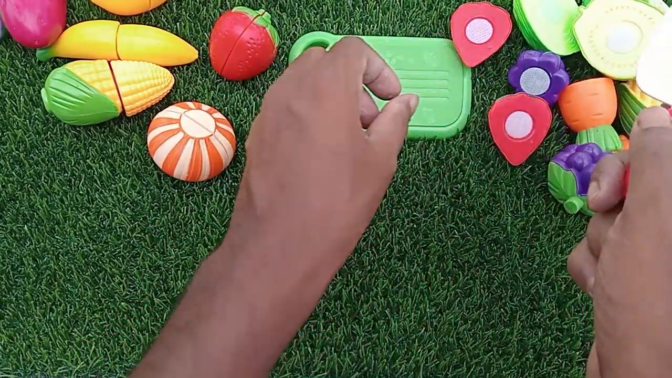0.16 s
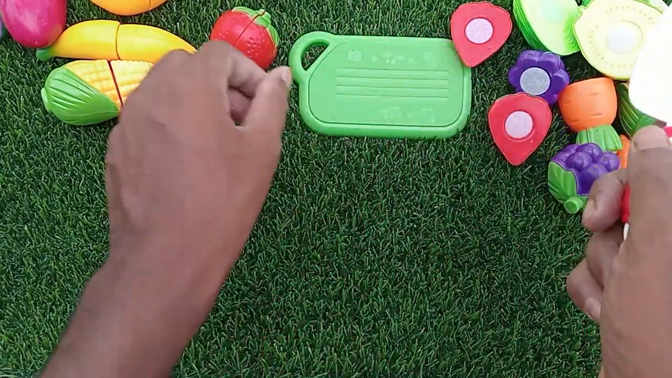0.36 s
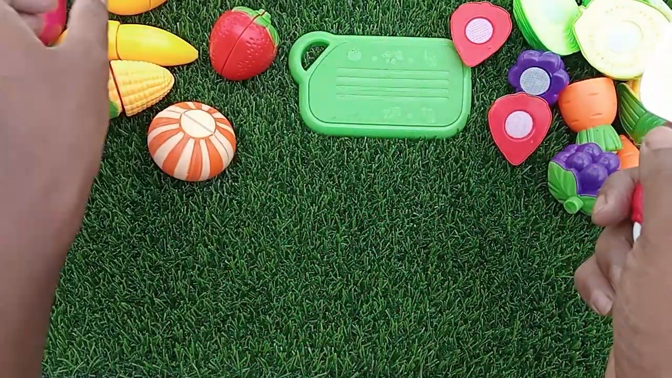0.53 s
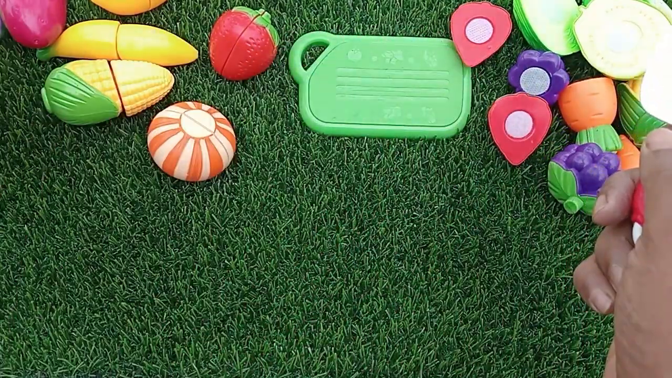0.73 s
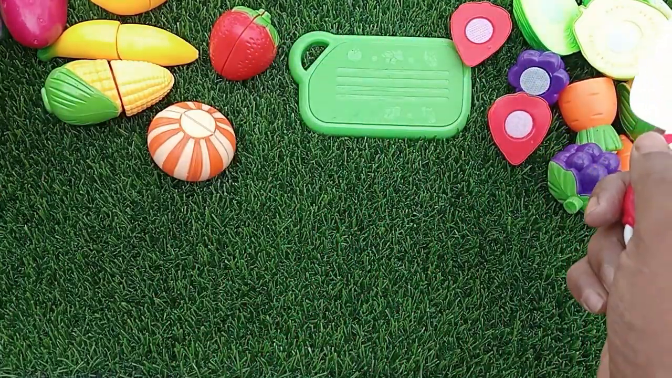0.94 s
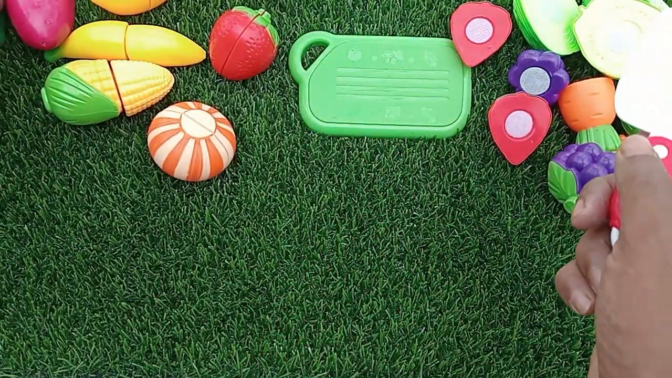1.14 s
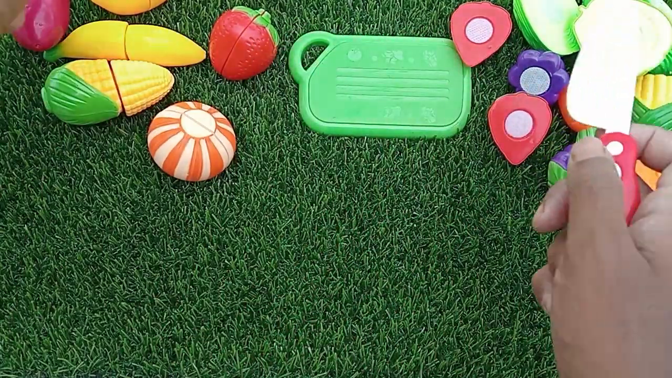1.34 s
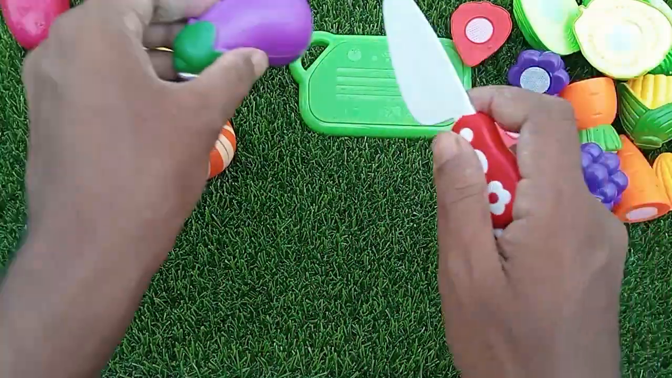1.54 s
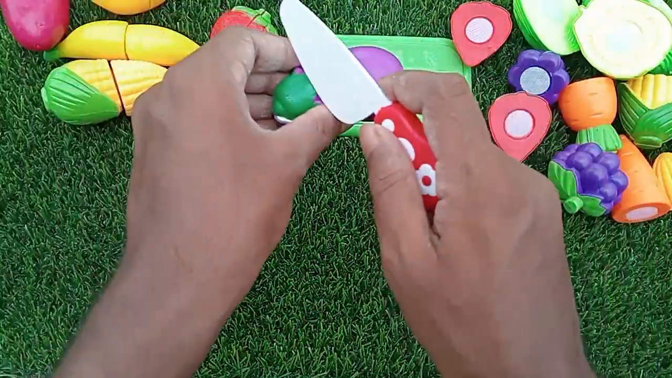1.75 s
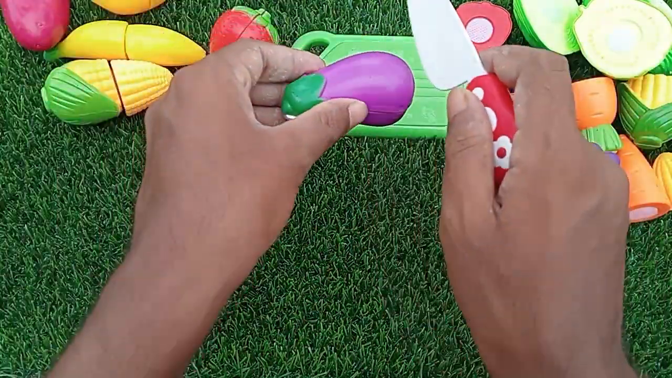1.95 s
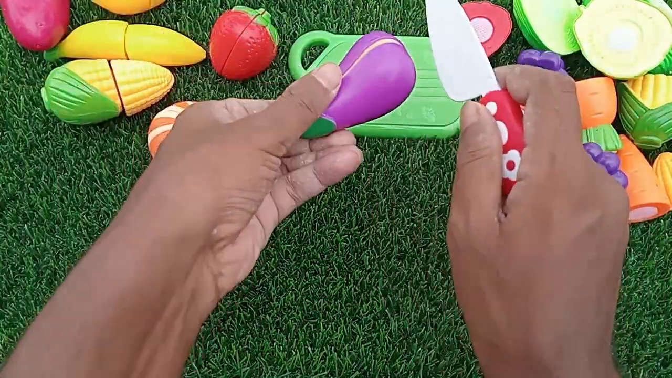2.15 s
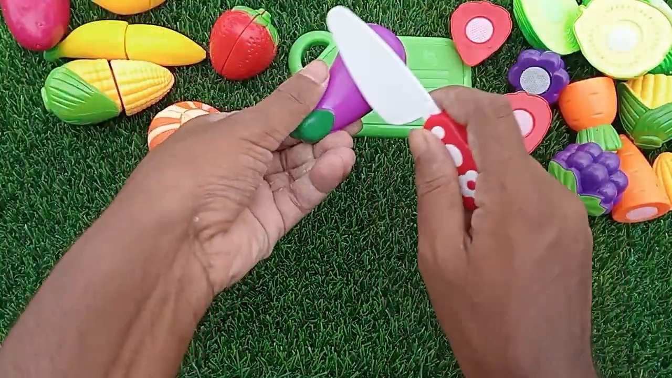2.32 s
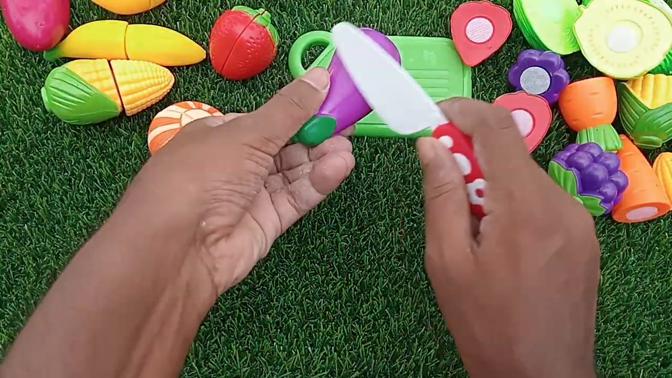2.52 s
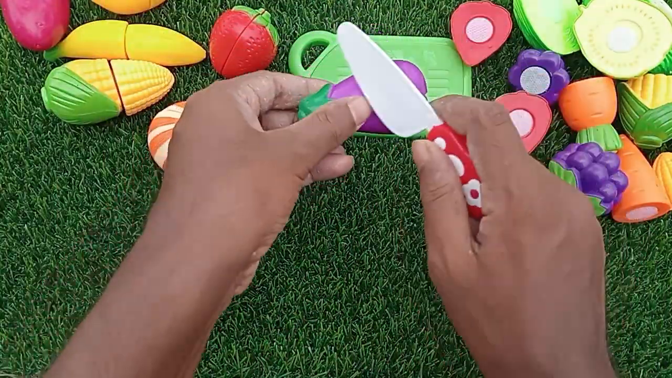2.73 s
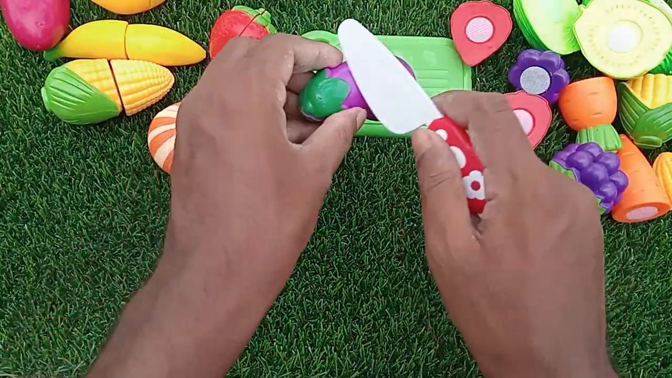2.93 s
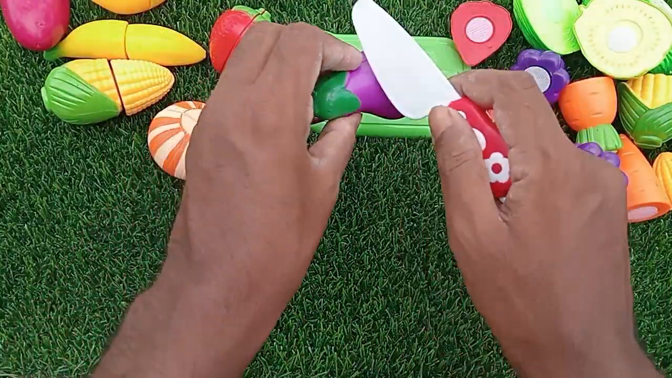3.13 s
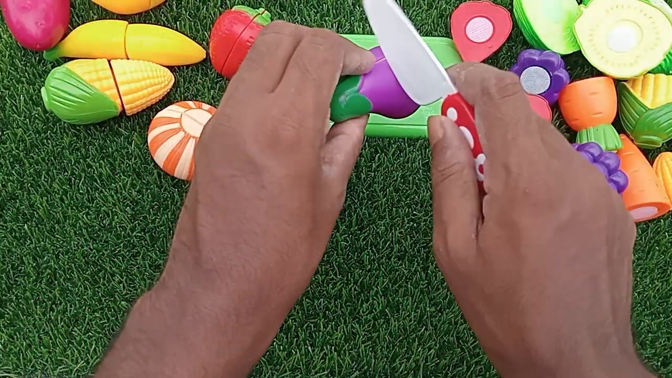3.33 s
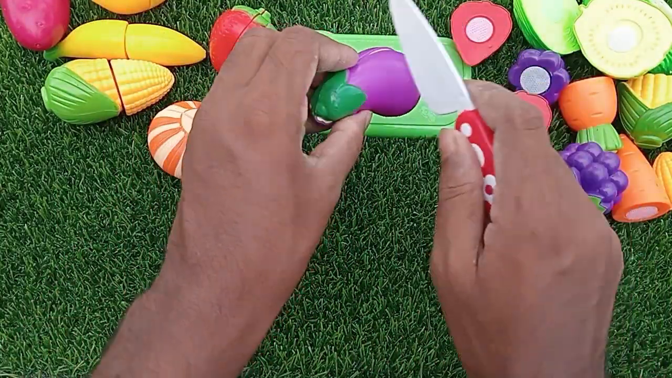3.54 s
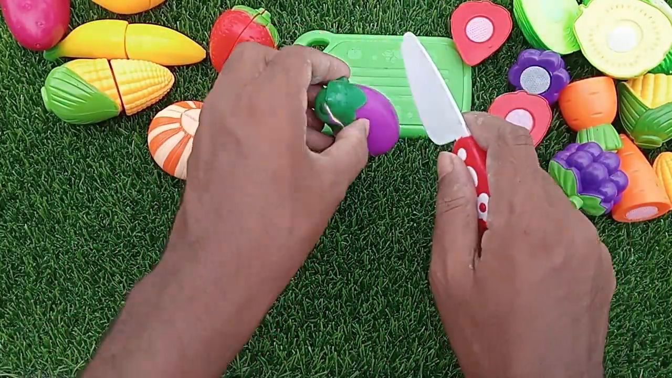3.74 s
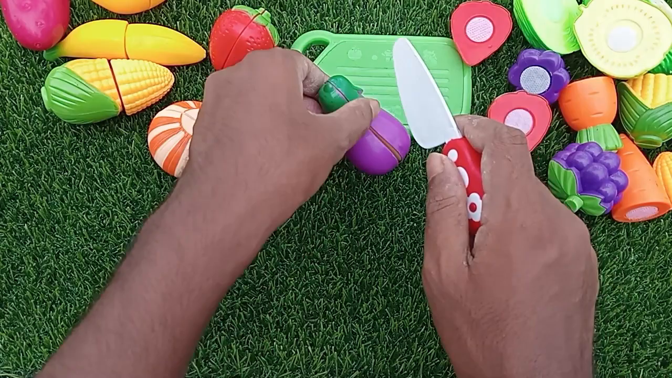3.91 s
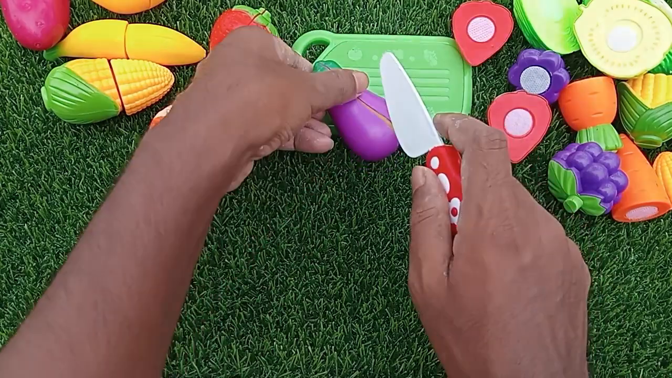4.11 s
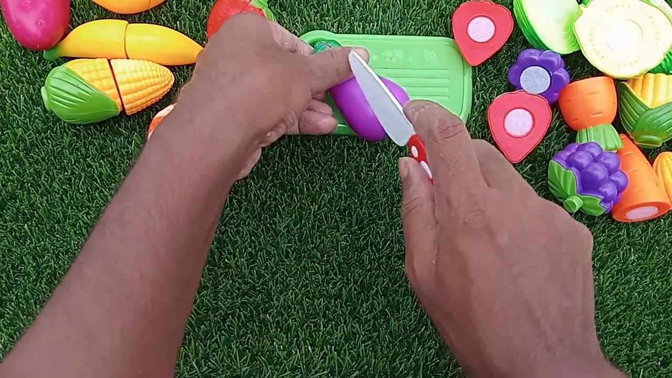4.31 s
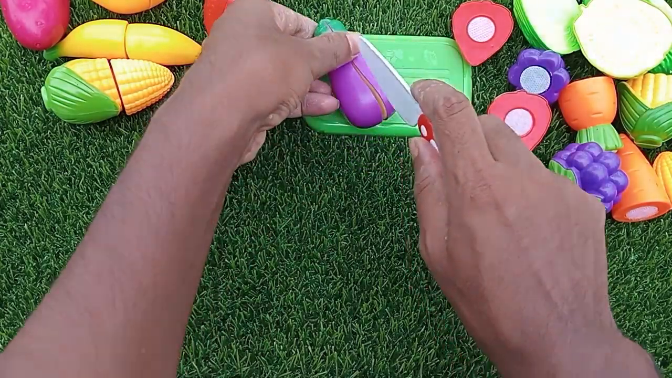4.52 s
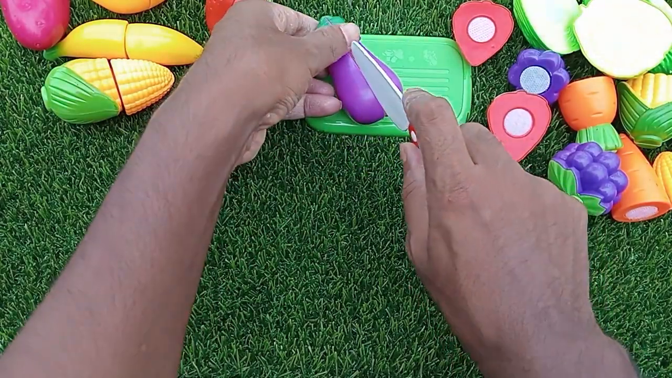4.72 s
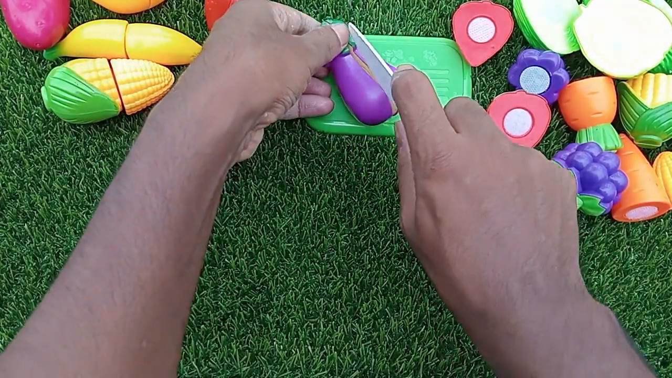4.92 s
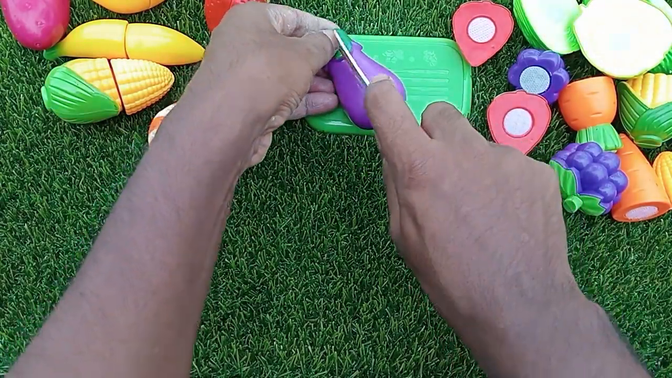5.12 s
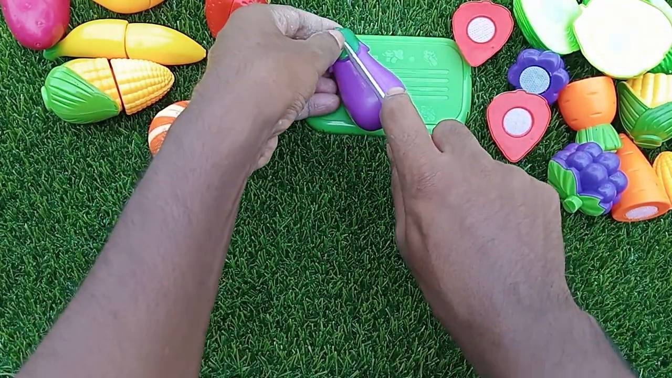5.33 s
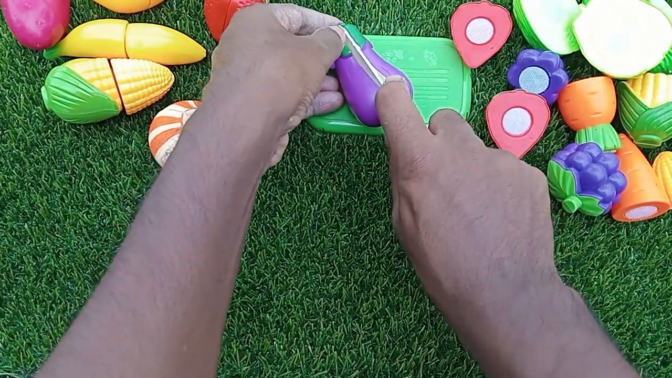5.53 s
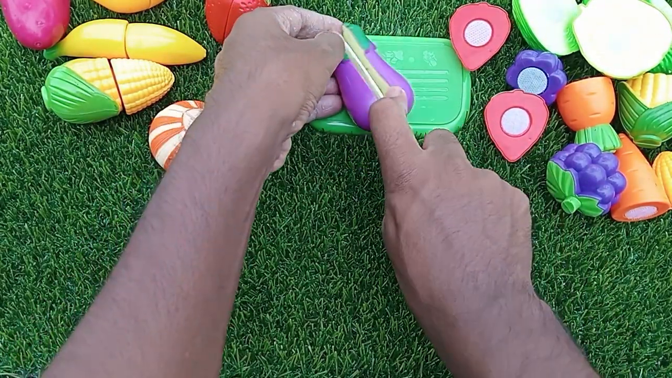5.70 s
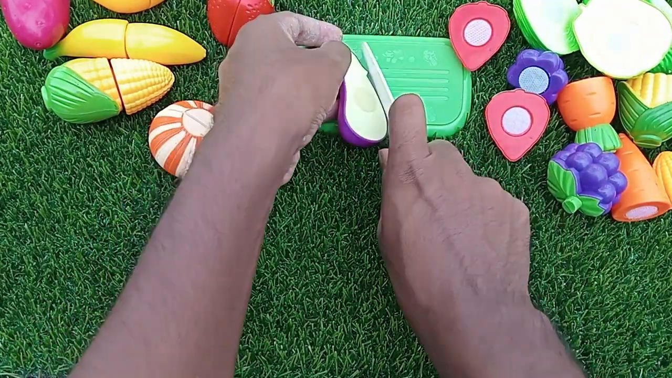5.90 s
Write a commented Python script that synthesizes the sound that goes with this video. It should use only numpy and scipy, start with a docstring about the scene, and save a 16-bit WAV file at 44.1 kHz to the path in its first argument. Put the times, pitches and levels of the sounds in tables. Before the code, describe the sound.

A loose plastic toy piece clicks and rocks once right at the start, close to the microphone. A soft hiss and low puffs of air on the microphone continue throughout, and two faint, falling chirps sound far away in the first second. From about 1.8 seconds a plastic knife taps a hollow toy eggplant, roughly four or five times a second, each a sharp clack with a short hollow ring; the three loudest come between 3.4 and 3.7 seconds. Quieter knocks and dull bumps follow, with a stronger puff of air near 4.7 and a clearer tap at 4.9. From 5.4 to 5.8 seconds the hook-and-loop pad between the halves rips apart in a quickening, growing run of crackling snaps. One half drops on the toy cutting board with a short clatter and thump. A faint, distant rising hoot comes at about 6 seconds.

```python
"""At a toy cutting board, close up, a hollow plastic fruit is turned in the hand and tapped with a
plastic knife; each tap rings its thin wall and the hollow inside. The knife then prises the halves
apart: the hook-and-loop pad rips in a quickening run of snaps and one half drops on the board.
Air buffets the microphone over a soft hiss; far off are two faint chirps and a rising hoot."""
import sys
import numpy as np
from scipy import signal
from scipy.fft import rfft, irfft
from scipy.io import wavfile
from scipy.ndimage import uniform_filter1d

SR = 44100
rng = np.random.default_rng(int(sys.argv[2]) if len(sys.argv) > 2 else 0)


def transcribe(u):
    """Save the signal u as a 16-bit wav file named by the first command-line argument.

    u: samples, shape (n,) or (channels, n), limited to [-1, 1]; the rate is SR.
    q: integer samples, one column per channel.
    """
    v = np.clip(np.atleast_2d(u).T, -1, 1)
    q = np.round(v * 32767).astype(np.int16)
    wavfile.write(sys.argv[1], SR, q)


N = 267246
TIME = np.arange(N) / SR
AGE = np.arange(SR // 10) / SR   # seconds since a contact

# Table levels are relative: the functions add their own trims.
# knocks on the hollow fruit, sharp taps and a few dull bumps:
# t/s, level/dB, wall f/Hz, hollow f/Hz, hollow ring/dB, thud/dB, crack/dB, after-hiss length/s
FRUIT_KNOCKS = [(1.821, -28, 2700, 1900, -26, -18, -14, 0.0081), (1.854, -38, 2800, 1910, -24, -26, -12, 0),
                (1.8582, -17, 2780, 1730, -12.5, -14, -13.5, 0.064),
                (2.1399, -32, 3800, 2350, -12, -7.5, 5.5, 0.059),
                (2.3523, -21.5, 3200, 2030, -23, -16, -11.5, 0.089),
                (2.5624, -18.5, 2720, 1890, -14.5, -17, -7.5, .055),
                (2.7864, -41.5, 3630, 1940, -9, -7, -6.5, 0.0087),
                (2.811, -25.5, 3460, 1900, -6.5, -11.5, -3, 0.047),
                (2.9806, -20, 3800, 1880, -8, -23, -10.5, 0.017),
                (3.214, -24, 2600, 2000, -6.5, -28, -7, 0.042),
                (3.409, -11.5, 3880, 1980, -7, -13.5, -8.5, 0),
                (3.5705, -11, 3940, 2040, -4, -12.5, -11.5, 0),
                (3.6886, -10.5, 4100, 1960, -2.5, -12.5, -5, 0.024),
                (4.524, -48, 4400, 2250, -14, -20, -20, 0.0027),
                (4.576, -51, 2400, 2290, 2.5, -6, -22, 0.0041), (4.676, -46, 3000, 1620, -3, -5, -28, 0),
                (4.9255, -27, 4000, 1700, -10.5, -14, -4.5, 0.034),
                (4.982, -46, 4400, 2250, -14, -19, -11, 0.0038),
                (5.067, -45, 4370, 2250, -7.5, -16, -12, 0.0028), (5.2466, -36, 2400, 2240, 2, -7.5, -9, 0),
                (5.255, -43, 2400, 2250, -1, -2, -12, 0.0015),
                (5.7723, -25.5, 2600, 1870, 1.5, -21, -9, 0.015),
                (5.799, -26, 4830, 1846, 1.5, -4, -8, 0.023),
                (5.843, -42, 4400, 1890, -5, -5, -5.5, 0.0017)]
# big bunches of hooks letting go: t/s, level/dB, wall f/Hz
SNAPS = [(5.3704, -27.5, 3420), (5.3995, -33.5, 3300), (5.4181, -27.5, 4340), (5.426, -22.5, 4380),
         (5.4379, -31.5, 4430), (5.4506, -27.5, 4270), (5.4617, -21, 3150), (5.4807, -28, 3130),
         (5.4913, -25, 3100), (5.519, -32, 4460), (5.5274, -20, 4350), (5.5577, -34, 3030),
         (5.5651, -22, 4350), (5.582, -24, 4360), (5.5918, -22.5, 4500), (5.5994, -21, 3270),
         (5.616, -24.5, 4570), (5.6233, -21.5, 4530), (5.6418, -20, 3630), (5.6482, -17, 4920),
         (5.6622, -28.5, 5130), (5.671, -22, 2520), (5.6844, -18.5, 2940), (5.696, -17.5, 2480),
         (5.7287, -31, 2470), (5.7335, -14.5, 2780), (5.751, -39, 2550), (5.771, -19, 3080)]
# crackle of single hooks between the snaps: t/s, rate/Hz, level/dB
PEEL = [(5.36, 2, -71), (5.42, 200, -48), (5.505, 40, -32), (5.55, 50, -31), (5.6, 400, -28),
        (5.69, 500, -34), (5.715, 120, -38.5), (5.76, 104, -43), (5.775, 791, -25.5), (5.81, 0, -25)]
# the fruit bumping the board: t/s, shell level/dB, board level/dB
BUMPS = [(4.0504, -39, -62), (5.141, -46.5, -40.5), (5.178, -50.5, -43), (5.7, -59, -32.5),
         (5.735, -51, -33), (5.773, -36, -31), (5.7846, -26, -26), (5.7901, -33, -29.5), (5.7984, -42, -30),
         (5.843, -65, -46), (5.982, -54.5, -66), (6.033, -44, -62)]
# a loose piece is let go and rocks once: t/s, level/dB
LOOSE_CLICKS = [(0.0879, -33), (0.129, -47)]
# short faint hisses with their own timing: t/s, length/s, level/dB
FAINT_HISSES = [(0.622, .025, -60.5), (1.98, 0.21, -63), (3.01, 0.049, -48), (5.239, 0.024, -45),
                (5.989, 0.052, -52)]
# far falling chirps, two overlapping notes each: t/s, length/s, start f/Hz, end f/Hz, level/dB
CHIRPS = [(0.176, 0.071, 4330, 4220, -59), (0.235, 0.065, 3840, 2754, -52), (0.697, .05, 4650, 4520, -62),
          (0.726, 0.064, 4000, 3630, -55.5)]
# far hoot: t/s, f/Hz, level/dB
HOOT = [(5.86, 573, -85), (5.91, 619, -62), (5.96, 657, -62), (5.995, 690, -53), (6.06, 695, -56)]
# draught on the microphone: t/s, level/dB
DRAUGHT = [(0.0, -51), (0.34, -41.5), (0.54, -55), (1.28, -54), (1.79, -49), (2.6, -55.5), (3.05, -56),
           (3.98, -60.5), (5.75, -56.5), (6.06, -59)]
# puffs of air: peak t/s, length/s, level/dB
GUSTS = [(0.005, .08, -40.5), (0.29, 0.23, -40), (0.464, 0.12, -39), (0.606, 0.051, -40),
         (0.895, 0.16, -43), (1.35, 0.048, -46), (1.53, 0.08, -43.5), (1.64, 0.12, -39.5),
         (2.091, 0.055, -43.5), (2.3, 0.24, -46), (3.248, .16, -48), (3.9, 0.036, -46), (4.027, 0.092, -50),
         (4.697, .17, -33), (5.47, .24, -50)]
# the bed of hiss: t/s, body level/dB, treble level/dB
BED_LEVELS = [(0, -56.5, -70.5), (.9, -58.5, -68), (1.1, -57, -65.5), (2.2, -58, -67.5), (3, -57.5, -65.5),
              (4, -58, -66.5), (5.2, -56, -66), (6.06, -57, -65)]

# resonances: f/Hz, level/dB, t60/s
SHELL_MODES = [(2850, 8.5, 0.006), (3350, 4, 0.0056), (3800, -3, 0.011), (4360, -3.5, 0.01),
               (4730, -12.5, 0.014)]   # the fruit's thin wall
HALVES_MODES = [(2480, -7, 0.011), (3040, -8.5, 0.01), (4700, -7, 0.0076), (5260, -11.5, 0.012)]   # the halves, held apart by the knife
BOARD_MODES = [(178, -5, 0.034), (294, -6, 0.053), (406, -8, 0.011), (575, -6, 0.035), (690, -6, 0.025)]   # the board on its soft mat
PIECE_MODES = [(1928, 1.5, 0.035), (3480, -8, 0.078), (4150, 0.5, .022), (7090, -16.5, 0.059),
               (8600, -20.5, 0.064)]   # the loose piece

# tone colours: f/Hz, level/dB
WALL_EQ = [(1500, -41), (2100, -14.5), (2500, 0.5), (3000, -6), (3900, 4), (4600, -1), (5400, -16),
           (6500, -27), (9000, -57.5)]   # clack of a contact
THUD_EQ = [(80, -12.5), (200, 1), (400, 7.5), (800, -3), (1200, 3), (1600, -5), (2100, -16), (3000, -35)]   # its low body
CRACK_EQ = [(3500, -20), (5200, -1.5), (6000, -3), (7500, -4.5), (9000, 0.5), (10500, -8), (13000, -15.5),
            (15500, -8)]   # its bright edge
PAD_EQ = [(100, -33), (220, -6.5), (500, -17.5), (1200, -7.5), (1500, -15), (2000, -0.5), (2500, -4),
          (3300, -1.5), (3800, -6), (4700, -1), (5400, -11), (6500, -10.5), (9000, -39)]   # body of the ripping pad
HOOK_EQ = [(3500, -21), (5200, -8.5), (6200, 1), (7600, -3), (9000, -0.5), (10000, -8), (12400, -9.5),
           (13300, -9), (14500, -8), (15500, -5.5)]   # bright edge of a hook letting go
FAINT_HISS_EQ = [(1200, -8), (2500, -4), (3300, 1.5), (4300, -1), (5500, -9), (7500, -12.5), (9000, -5.5),
                 (11000, -19), (15500, -15.5)]   # colour of the faint hisses
RUMBLE_EQ = [(15, -56), (25, -38), (40, -11.5), (58, -0.5), (80, 1.5), (115, -1.5), (160, -9.5), (240, -21),
             (400, -34.5), (800, -69.5)]   # air on the microphone
BED_EQ = [(100, -3.5), (200, 4.5), (350, 0.5), (650, -1), (1000, -5), (1800, -8), (3000, -8.5), (4100, -8),
          (5200, -18.5), (7000, -24), (10000, -58)]   # body of the hiss bed
BED_TREBLE_EQ = [(3500, -24), (5500, 0), (7500, -3), (9000, 3.5), (10500, -8), (13000, -10.5),
                 (15500, -9.5)]   # its airy top

THUD_HZ = 1260   # resonance of the plastic's thud


def fruit_knocks(hollow_trim_db=2.5, thud_trim_db=0.5, gripped_t60=0.006, free_t60=0.042):
    """Sharp taps and a few dull bumps: the less the fingers damp the hollow, the more it rings."""
    out = np.zeros(N)
    for s, level_db, wall_hz, hollow_hz, ring_db, thud_db, crack_db, _ in FRUIT_KNOCKS:
        t60 = gripped_t60 + (free_t60 - gripped_t60) * from_db(min(ring_db, 0)) ** 3
        hit = knock(wall_hz, hollow_hz, t60, ring_db + hollow_trim_db, thud_db + thud_trim_db, crack_db)
        add(out, s, from_db(level_db) * hit)
    return out


def knock(wall_hz, hollow_hz, hollow_t60, hollow_db, thud_db, crack_db, clack_db=-13):
    """One blow on the fruit, in four layers: wall ring, hollow ring, thud and crack."""
    wall = response(WALL_EQ)
    force = contact(hold=0.00089, t60=0.013, scatter=4.5)
    push = contact(hold=0.0027, t60=0.014, scatter=0.65)
    flex = through(contact(hold=0.0018, t60=0.0058, scatter=1.0), wall)
    clack = from_db(clack_db) * unit_blow(through(force, wall))
    sound = unit_blow(shell_ring(flex, wall_hz) + clack)
    sound += from_db(hollow_db) * unit_blow(ring(push, hollow_hz, hollow_t60))
    sound += from_db(thud_db) * unit_blow(ring(through(push, response(THUD_EQ)), THUD_HZ, t60=0.0032))
    return sound + from_db(crack_db) * unit_blow(through(force, response(CRACK_EQ)))


def shell_ring(force, favoured_hz, falloff_db_per_octave=43, detune=0.0045):
    """The shell's modes: the spot struck favours those near one pitch, and the grip detunes them."""
    out = 0
    for hz, level_db, t60 in SHELL_MODES:
        gain = from_db(level_db - falloff_db_per_octave * abs(np.log2(hz / favoured_hz)))
        gripped_hz = hz * (1 + detune * rng.standard_normal())
        out = out + gain * unit_blow(ring(force, gripped_hz, t60))
    return unit_blow(out)


def rip(snap_db=0.5, wall_db=-6.5, halves_db=-5.5, crack_db=-8.5, straggler_s=0.004, straggler_db=-10.5):
    """Hooks let go in bunches, each jerk ringing the parting halves; a straggler trails every snap."""
    out = np.zeros(N)
    pad, crack = unit_blow(response(PAD_EQ)), unit_blow(response(HOOK_EQ))
    halves = sum(from_db(db + halves_db) * unit_blow(ring(pad, hz, t60)) for hz, db, t60 in HALVES_MODES)
    body = unit_blow(pad + halves)
    for s, level_db, wall_hz in SNAPS:
        for lag, drop_db in ((0, 0), (straggler_s, straggler_db)):
            force = contact(hold=0.00097, t60=0.01, scatter=3.2)
            shell = unit_blow(through(force, body))
            snap = unit_blow(shell + from_db(wall_db) * unit_blow(ring(shell, wall_hz, t60=0.012)))
            snap += from_db(crack_db) * unit_blow(through(force, crack))
            onset = s + lag * (1 + 0.25 * rng.standard_normal())
            add(out, onset, from_db(level_db + drop_db + snap_db) * snap)
    return out + hook_crackle(body, crack)


def hook_crackle(body, crack, trim_db=-3, crack_db=-9):
    """Single hooks pop at random between the snaps, ticking through the pad and the halves."""
    per_s, level_db = in_time(PEEL)
    peeling = (TIME > PEEL[0][0]) & (TIME < PEEL[-1][0])
    pops = peeling * (rng.random(N) < per_s / SR)
    strength = np.clip(rng.standard_normal(N), -1, 1) * from_db(level_db + trim_db)
    return through(pops * strength, unit_blow(body + from_db(crack_db) * crack))


def board_bumps():
    """The fruit meets the board: a dull knock from the shell, a short thump from the board."""
    out = np.zeros(N)
    for s, shell_db, board_db in BUMPS:
        shell = knock(wall_hz=2400, hollow_hz=1800, hollow_t60=0.0095,
                      hollow_db=7.5, thud_db=4.5, crack_db=-26)
        add(out, s, from_db(shell_db) * shell)
        push = contact(hold=0.003, t60=0.017, scatter=1.0)
        for hz, mode_db, t60 in BOARD_MODES:
            thump = unit_blow(ring(push, hz, t60))
            add(out, s, rng.choice([-1, 1]) * from_db(board_db + mode_db) * thump)
    return out


def loose_piece(thud_db=-11, wall_db=-4, crack_db=-22):
    """A piece that no hand holds clacks and rings freely."""
    out = np.zeros(N)
    for s, level_db in LOOSE_CLICKS:
        force = contact(hold=0.0013, t60=0.015, scatter=1.0)
        thud = ring(through(force, response(THUD_EQ)), THUD_HZ, t60=0.0026)
        sound = sum(from_db(db) * unit_blow(ring(force, hz, t60)) for hz, db, t60 in PIECE_MODES)
        sound += from_db(wall_db) * unit_blow(through(force, response(WALL_EQ)))
        sound += from_db(thud_db) * unit_blow(thud)
        sound += from_db(crack_db) * unit_blow(through(force, response(CRACK_EQ)))
        add(out, s, from_db(level_db) * sound)
    return out


def faint_hisses(grain_db=3, delay_s=0.0075, after_db=-54.5):
    """Short, faint, grainy hisses that swell and fade, most of them just after a knock."""
    envelope = np.zeros(N)
    after_hisses = [(s + delay_s, length, after_db) for s, *_, length in FRUIT_KNOCKS if length > 0]
    for s, length, level_db in after_hisses + list(FAINT_HISSES):
        add(envelope, s, from_db(level_db) * signal.windows.tukey(int(length * SR), .5))
    grain = from_db(grain_db * wobble(N, smoothing=100))
    return envelope * rms_one(grain * coloured_noise(FAINT_HISS_EQ))


def reflections(x, near_db=-25, near_t60=0.042, far_db=-35, far_t60=0.32):
    """Weak scatter off the toys nearby and a fainter, longer tail, both after a short pre-delay."""
    out = np.zeros(N)
    age = np.arange(SR // 2) / SR
    for level_db, t60 in ((near_db, near_t60), (far_db, far_t60)):
        tail = rng.standard_normal(len(age)) * from_db(-60 * age / t60) * (age > .003)
        out += from_db(level_db) * through(x, tail / np.linalg.norm(tail))
    return out


def far_chirps(waver_hz=130, direct_db=-3, echo_db=-3, echo_t60=.45):
    """Wavering downward sweeps, blurred by distance."""
    chirps = np.zeros(N)
    for s, length, start_hz, end_hz, level_db in CHIRPS:
        count = int(length * SR)
        hz = np.linspace(start_hz, end_hz, count) + waver_hz * wobble(count, smoothing=60)
        add(chirps, s, from_db(level_db) * np.hanning(count) * tone(hz))
    age = np.arange(SR // 2) / SR
    tail = rng.standard_normal(len(age)) * from_db(-60 * age / echo_t60)
    return from_db(direct_db) * chirps + from_db(echo_db) * through(chirps, tail / np.linalg.norm(tail))


def far_hoot():
    """One soft pure tone that swells as it rises."""
    hz, level_db = in_time(HOOT)
    return (TIME > HOOT[0][0]) * from_db(level_db) * tone(hz)


def air_buffet(draught_db=-1.0, flutter_db=4.0, gust_db=-1.5):
    """A fluttering draught and single puffs rumble on the microphone."""
    flow_db, = in_time(DRAUGHT)
    flutter = rms_one(uniform_filter1d(wobble(N, smoothing=2200), size=2200))
    power = from_db(flow_db + draught_db + flutter_db * flutter) ** 2
    for s, length, peak_db in GUSTS:
        swell = np.cos(np.pi * np.clip((TIME - s) / length, -.5, .5))
        power += (from_db(peak_db + gust_db) * swell) ** 2
    rumble = coloured_noise(RUMBLE_EQ)
    rumble /= np.sqrt(uniform_filter1d(rumble ** 2, size=4000))   # the air flow alone sets its swell
    return np.sqrt(power) * rumble


def hiss_bed(body_trim_db=1.5, treble_trim_db=-3.0):
    """A soft, nearly even noise bed with an airy top."""
    body_db, treble_db = in_time(BED_LEVELS)
    body = from_db(body_db + body_trim_db) * coloured_noise(BED_EQ)
    return body + from_db(treble_db + treble_trim_db) * coloured_noise(BED_TREBLE_EQ)


def contact(hold, t60, scatter, rise=0.0013):
    """A sharp impulse, then dense reflections in the shell that build, hold and die; times in s."""
    swell = np.minimum(AGE / rise, 1) * from_db(-60 * np.maximum(AGE - hold, 0) / t60)
    echoes = rng.standard_normal(len(AGE)) * swell
    force = scatter * echoes / np.linalg.norm(echoes)
    force[0] += rng.choice([-1, 1])
    return force


def ring(x, hz, t60):
    """One damped mode driven by x."""
    radius, angle = from_db(-60 / (t60 * SR)), 2 * np.pi * hz / SR
    return signal.lfilter([1, 0, -1], [1, -2 * radius * np.cos(angle), radius * radius], x)


def response(eq, size=4096):
    """Minimum-phase impulse response of an EQ curve."""
    hz, db = np.transpose(eq)
    grid = np.maximum(np.arange(size // 2 + 1) * SR / size, 1)
    gain = from_db(np.interp(np.log(grid), np.log(hz), db))
    cepstrum = irfft(np.log(gain))
    cepstrum[1:size // 2] *= 2   # fold forward, so nothing rings ahead of the attack
    cepstrum[size // 2 + 1:] = 0
    return irfft(np.exp(rfft(cepstrum)))


def through(x, impulse):
    """Filter x by an impulse response."""
    return signal.fftconvolve(x, impulse)[:len(x)]


def coloured_noise(eq, size=8192):
    """Steady noise shaped by an EQ curve, rms 1."""
    return rms_one(signal.fftconvolve(rng.standard_normal(N + size - 1), response(eq, size), "valid"))


def wobble(count, smoothing):
    """Random modulation, rms 1; smoothing in samples."""
    return rms_one(uniform_filter1d(rng.standard_normal(count), size=smoothing))


def tone(hz):
    """A sine that follows a pitch curve, rms 1."""
    return np.sqrt(2) * np.sin(2 * np.pi * np.cumsum(hz) / SR)


def from_db(db):
    """Decibels to gain."""
    return 10 ** (np.asarray(db) / 20)


def rms_one(x):
    """Scale to rms 1."""
    return x / np.sqrt(np.mean(x ** 2) + 1e-20)


def unit_blow(x):
    """Scale to the energy of 3 ms at rms 1."""
    return x / np.sqrt(np.sum(x ** 2) / (.003 * SR) + 1e-20)


def in_time(rows):
    """Join timed breakpoints by straight lines, one curve per value column."""
    s, *columns = np.transpose(rows)
    return [np.interp(TIME, s, column) for column in columns]


def add(out, s, sound):
    """Mix a short sound in at time s."""
    start = int(np.clip(round(s * SR), 0, N - 1))
    out[start:start + len(sound)] += sound[:N - start]


def scene():
    """The toys up front, with far calls, air and hiss behind them, in mono."""
    close = loose_piece() + fruit_knocks() + rip() + board_bumps() + faint_hisses()
    return (close + reflections(close) + far_chirps() + far_hoot() + air_buffet() + hiss_bed())[None]


def record(dry, low_cut_hz=36, high_cut_hz=15700):
    """The microphone drops the deepest bass, clips any peak over full scale and cuts the top."""
    low_cut = signal.butter(2, low_cut_hz, "high", fs=SR, output="sos")
    high_cut = signal.ellip(10, .2, 80, high_cut_hz, fs=SR, output="sos")
    clipped = np.clip(signal.sosfilt(low_cut, dry), -1, 1)
    return signal.sosfilt(high_cut, clipped)


dry = scene()
out = record(dry)
transcribe(out)
```